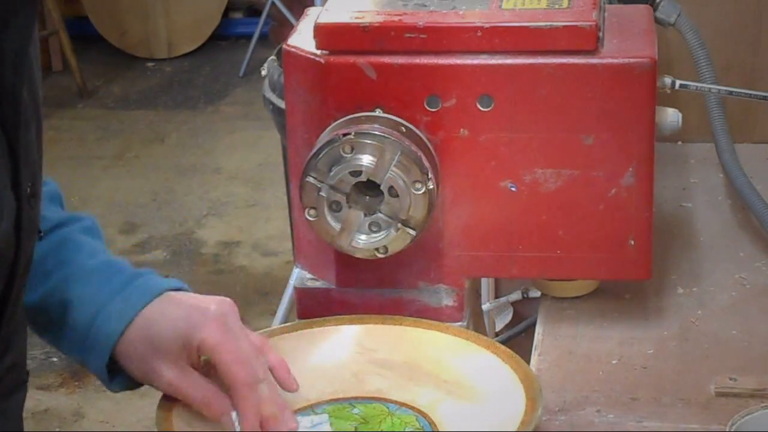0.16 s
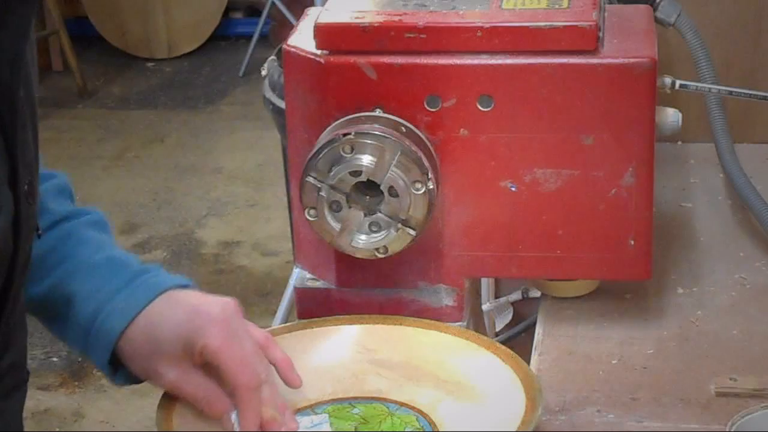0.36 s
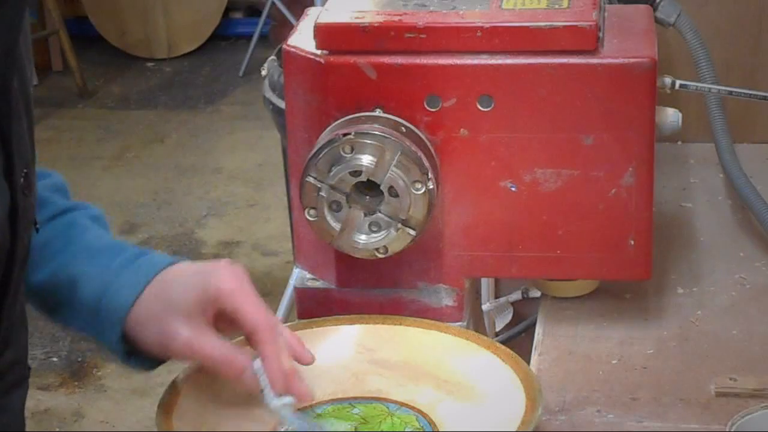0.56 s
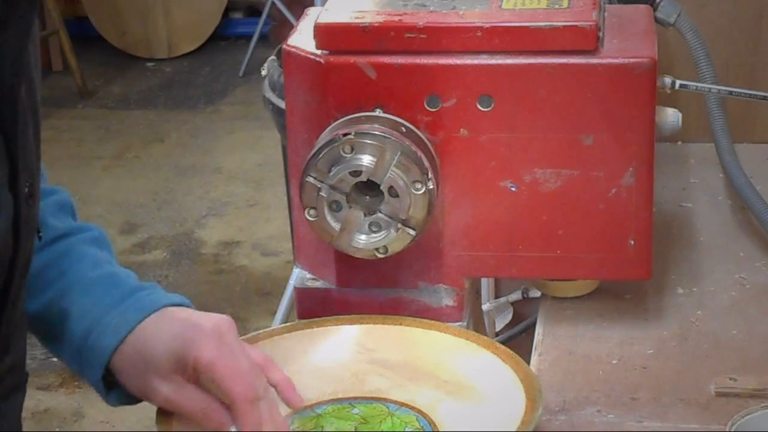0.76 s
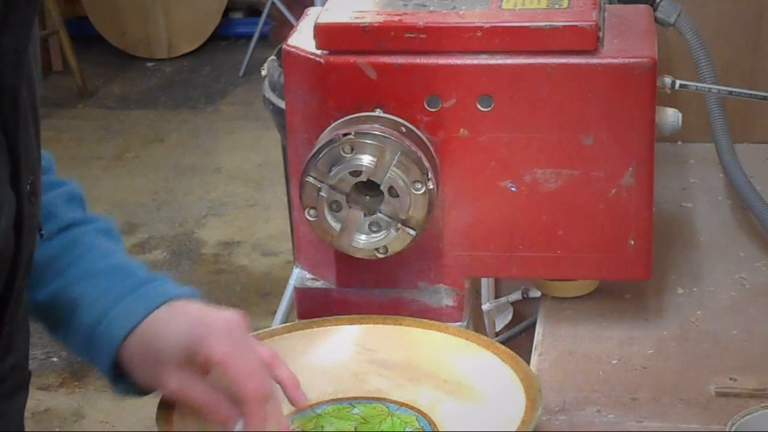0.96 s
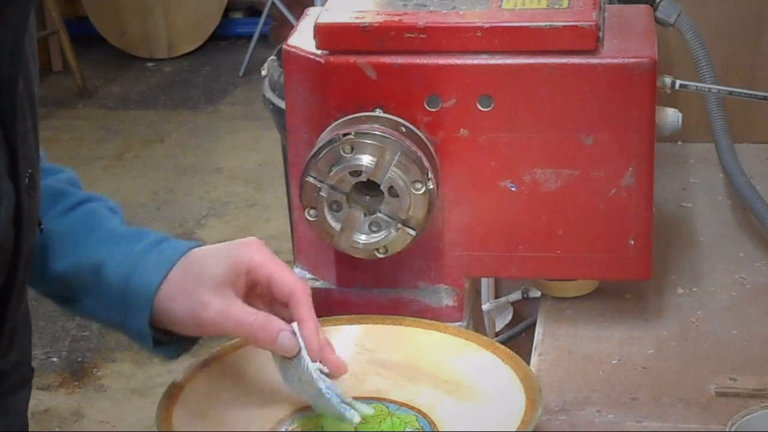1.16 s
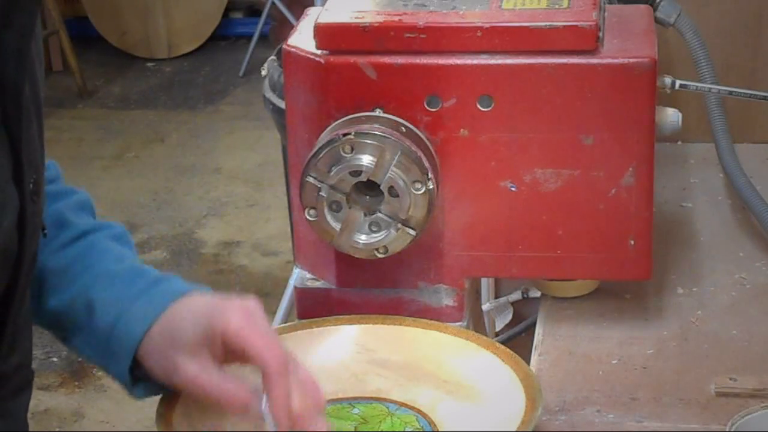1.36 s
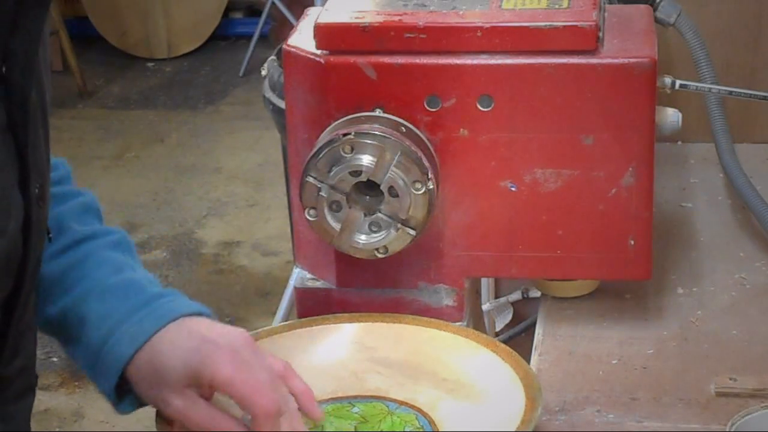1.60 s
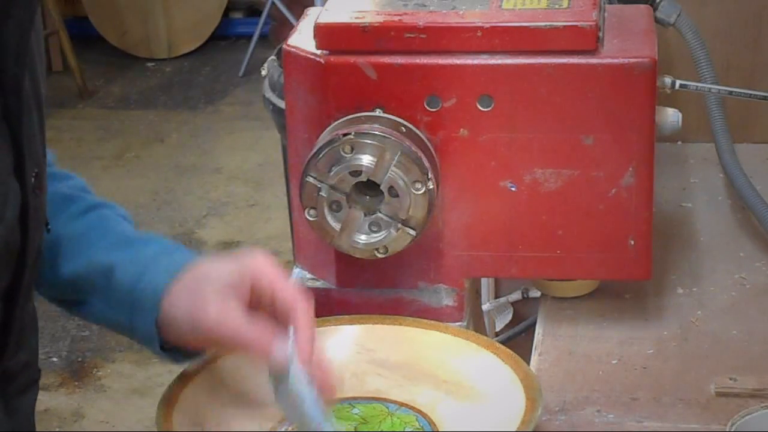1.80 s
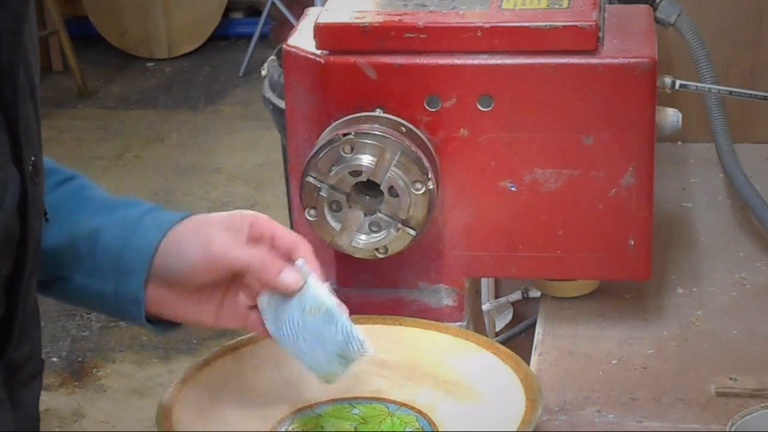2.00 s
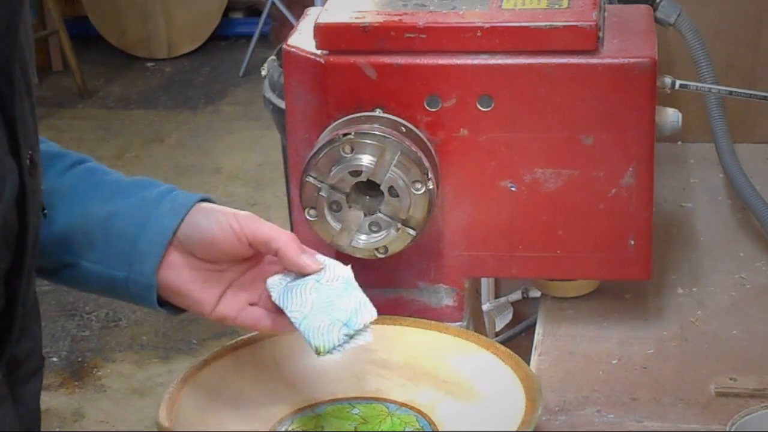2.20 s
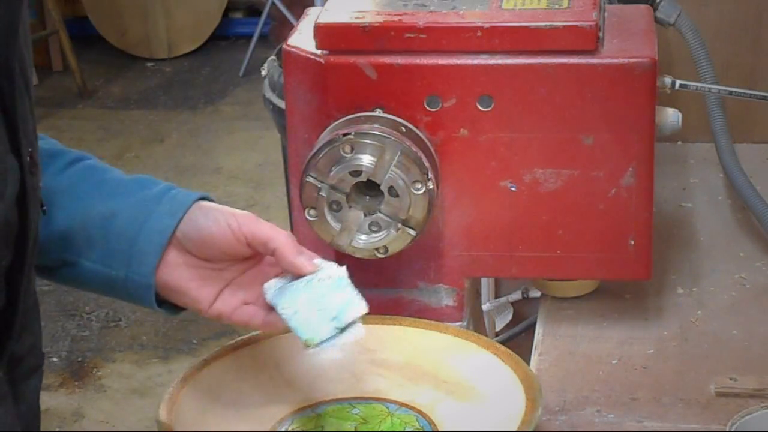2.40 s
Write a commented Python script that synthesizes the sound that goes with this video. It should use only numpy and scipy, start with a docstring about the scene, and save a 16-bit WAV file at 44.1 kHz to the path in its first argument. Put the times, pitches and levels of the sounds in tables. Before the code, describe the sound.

Close dabs of a folded paper towel knock lightly on a wooden bowl, the paper rustling as it presses and peels away, twice squeaking faintly. A quiet, steady electrical hum and hiss fill the small workshop behind.

```python
"""A folded paper towel is dabbed into a wooden bowl, close in front of the microphone in a small workshop.
Each dab knocks the wood, which thuds, cracks and rings briefly. The paper crackles as it is pressed
and peeled off: fibres catch and slip, creases snap, and twice it squeaks faintly.
Farther back are a steady mains hum, a thin electrical whine and soft hiss."""
import sys
import numpy as np
from scipy import signal
from scipy.fft import rfft, irfft
from scipy.io import wavfile

SR = 44100
rng = np.random.default_rng(int(sys.argv[2]) if len(sys.argv) > 2 else 0)


def file_out(sig):
    """Save sig as 16-bit WAV at sys.argv[1]."""
    # one column per channel
    cols = np.atleast_2d(sig).T
    # limit, then scale
    lim = np.clip(cols, -1, 1)
    pcm = np.round(lim * 32767).astype(np.int16)
    wavfile.write(sys.argv[1], SR, pcm)


N = 108000
T = np.arange(N) / SR


def from_db(db):
    """Decibels to gain."""
    return 10 ** (np.asarray(db) / 20)


def rms_one(x):
    """Scale to rms 1."""
    return x / np.sqrt(np.mean(x ** 2) + 1e-20)


def cut(x, hz, kind, order=2):
    """Butterworth low- or high-pass."""
    return signal.sosfilt(signal.butter(order, hz, kind, fs=SR, output="sos"), x + 1e-18)


def coloured(x, spectrum):
    """Give a white signal a spectrum, keeping its power."""
    hz, db = np.transpose(spectrum)
    gain = from_db(np.interp(np.log(np.fft.rfftfreq(N, 1 / SR) + 1), np.log(hz), db))
    return irfft(rfft(x) * rms_one(gain), N)


def drift(rate_hz):
    """Random wandering of spread 1, mostly slower than rate_hz."""
    rolloff = 1 + (np.fft.rfftfreq(N, 1 / SR) / rate_hz) ** 2
    return rms_one(irfft(rfft(rng.standard_normal(N)) / rolloff, N))


def swell(s, rise, fall):
    """Exponential rise to 1 at time s, then exponential fall."""
    return np.exp(-np.maximum((s - T) / rise, (T - s) / fall))


# Mains hum in the background: f/Hz, rms level/dB
HUM_TONES = [(100, -76), (200, -78.5), (300, -71), (400, -65.5), (500, -79.5), (555, -70.5), (600, -83.5)]
# Thin electrical whine high above it: f/Hz, rms level/dB
WHINE_TONES = [(7838, -76), (7897, -75.5), (12000, -79)]
def hum_and_whine(waver_db=1.5, wander_rad=0.19):
    """Steady electrical tones, each wavering a little in level and phase."""
    out = 0
    for hz, db in HUM_TONES + WHINE_TONES:
        peak = np.sqrt(2) * from_db(db - waver_db * drift(9))
        phase = 2 * np.pi * hz * T + wander_rad * drift(2.5) + rng.uniform(0, 2 * np.pi)
        out = out + peak * np.sin(phase)
    return out


# Room tone of the workshop: f/Hz, relative level/dB
HISS_SPECTRUM = [(25, -12), (45, -7.5), (70, -2), (100, 5), (170, -3.5), (270, -6), (400, 5), (560, 0.5),
                 (800, 3.5), (1150, 4.5), (1500, 3.5), (3000, 4), (4700, 5.5), (5500, -0.5), (7500, -1),
                 (9500, -3.5), (14000, -4.5)]
def hiss(level_db=-54.5):
    """Soft, even noise behind everything."""
    return from_db(level_db) * coloured(rng.standard_normal(N), HISS_SPECTRUM)


# The towel pressed or peeled, close up: loudest t/s, level/dB, rise/s, fall/s
TOWEL_MOVES = [(.03, -55.5, 0.085, 0.056), (.125, -54, 0.033, .03), (.18, -45.5, 0.022, 0.023),
               (0.474, -45.5, 0.031, .014), (0.495, -43, 0.0073, 0.017), (.635, -52, 0.047, .02),
               (.702, -49.5, 0.017, 0.022), (0.76, -42, 0.0073, .016), (.82, -52, 0.009, 0.009),
               (.906, -55, 0.0045, 0.01), (1.075, -38.5, 0.013, 0.022), (1.139, -47, 0.013, 0.022),
               (1.343, -47.5, 0.0034, 0.013), (1.425, -51, 0.043, 0.077), (1.55, -52.5, 0.014, 0.07),
               (1.65, -57, 0.024, 0.11), (1.782, -44.5, 0.026, 0.021), (1.828, -46, 0.0092, 0.0094),
               (2.03, -60.5, 0.057, 0.17)]
# Colour of its rustle: f/Hz, relative level/dB
RUSTLE_SPECTRUM = [(150, -30), (800, -22.5), (1200, -2.5), (1550, -8.5), (2050, -1.5), (3100, -5.5),
                   (3800, 2), (4300, -1), (4950, 2), (5400, -7), (7000, -7.5), (9000, -16), (14000, -25.5)]
def paper_rustle(fibres_per_s=5000, spread_db=4, friction_gain=0.75):
    """Fibres catch and slip in dense tiny clicks, over friction noise, under each movement."""
    sizes = from_db(spread_db * np.minimum(rng.exponential(1, N), 4))
    signs = rng.choice([-1, 1], N)
    slips = rng.random(N) < fibres_per_s / SR
    grain = rms_one(rms_one(sizes * signs * slips) + friction_gain * rng.standard_normal(N))
    power = sum((from_db(db) * swell(s, rise, fall)) ** 2 for s, db, rise, fall in TOWEL_MOVES)
    return coloured(grain * np.sqrt(power), RUSTLE_SPECTRUM)


# Single creases giving way: t/s, level/dB
CREASES = [(0.486, -36.5), (0.491, -42.5), (0.5473, -42), (0.761, -47), (1.032, -50), (1.078, -37.5),
           (1.139, -44.5), (1.341, -58), (1.812, -39), (1.826, -48)]
# Colour of a snap: f/Hz, relative level/dB
CREASE_SPECTRUM = [(200, -37), (600, -5), (1200, -8), (2100, -0.5), (4800, -1.5), (6000, -6), (14000, -19)]
def crease_snaps(rise_s=0.00036, fall_s=0.0044):
    """A crease snaps in a sharp, short burst of noise."""
    bursts = sum(from_db(db) * swell(s, rise_s, fall_s) for s, db in CREASES)
    return coloured(bursts * rng.standard_normal(N), CREASE_SPECTRUM)


def ring(x, hz, t60):
    """A unit click sets a sine of height 1 ringing."""
    decay, step = from_db(-60 / (t60 * SR)), 2 * np.pi * hz / SR
    return signal.lfilter([0, np.sin(step)], [1, -2 * decay * np.cos(step), decay ** 2], x + 1e-18)


def wood_mode(push, hz, t60, build_cycles=7.2):
    """A resonance of the bowl: it swells over a few cycles, then dies away."""
    # Neighbouring thud modes swing in opposite directions; each mode moves with the nearest one.
    nearest = np.argmin(np.abs(np.array(THUD_MODES)[:, 0] - hz))
    return (-1) ** nearest * (ring(push, hz, t60) - ring(push, hz, build_cycles / hz))


# Dabs knocking the bowl, close up: t/s, push level/dB, brightness f/Hz, low cut f/Hz,
# crack level/dB, ring gain/dB, place along the wall/0-1
DABS = [(.1756, -7.5, 1500, 204, -47, 0, 0.48), (.1872, -1, 2660, 224, -36, -2.5, 0.56),
        (0.3788, -8.5, 3430, 365, -35.5, 0.5, 0.57), (0.7676, -7, 510, 238, -59, -4, 0.28),
        (1.7210, -3.5, 3920, 148, -30.5, -1, 0), (1.7492, -8, 1680, 360, -43, -16, 0.53)]
# Dry crack of the wood's many close modes: f/Hz, relative level/dB
CRACK_SPECTRUM = [(80, -21), (170, -1), (260, -9.5), (380, -0.5), (580, -3), (780, 3), (1200, -1.5),
                  (2200, 5), (2900, -3.5), (4700, -9), (5600, -18), (12000, -39)]
# Broad, heavily damped modes of the bowl: f/Hz, gain/dB, t60/s
THUD_MODES = [(434.5, -19.5, 0.039), (561, -17.5, 0.036), (1147, -24, 0.032), (1475, -24.5, 0.011),
              (2107, -16.5, 0.011), (3620, -31, .02), (4650, -40, .03)]
# Its longer-ringing modes: f/Hz, gain/dB, t60/s
RING_MODES = [(240, -49, .35), (316, -44, .28), (386, -34, .22), (484, -35, .16), (515, -39, .15),
              (566, -27, .14), (596, -34, .13), (965, -44, .15), (1105, -30, .09), (1180, -31, .1),
              (1291, -39, .19), (1525, -41, .07), (1789, -35, .1), (1903, -43, .11), (2081, -34, .09),
              (2283, -43, .12), (2587, -40, .08)]
def bowl_knocks(crack_rise_s=0.00097, crack_fall_s=0.012, place_swing_db=6.5):
    """Each cushioned push gives a dry crack, a thud and a ring whose modes depend on where it lands."""
    pushes, crack_envelope = [], 0
    for s, db, bright_hz, low_cut_hz, crack_db, _, _ in DABS:
        click = from_db(db) * (np.arange(N) == int(s * SR))
        cushioned = cut(click, bright_hz, "low", order=1)
        pushes.append(cut(cushioned, low_cut_hz, "high", order=3))
        crack_envelope += from_db(crack_db) * swell(s + crack_rise_s, crack_rise_s, crack_fall_s)
    crack = coloured(crack_envelope * rng.standard_normal(N), CRACK_SPECTRUM)
    thud = sum(from_db(db) * wood_mode(sum(pushes), hz, t60) for hz, db, t60 in THUD_MODES)
    *_, ring_db, place = np.transpose(DABS)
    ringing = 0
    for k, (hz, db, t60) in enumerate(RING_MODES):
        strengths = from_db(db + ring_db + place_swing_db * np.cos(np.pi * k * place))
        ringing += wood_mode(strengths @ np.array(pushes), hz, t60)
    return crack + thud + ringing


# Faint squeaks at the bowl, the second in two parts: t/s, length/s, start f/Hz, end f/Hz, level/dB
SQUEAK_GLIDES = [(0.214, 0.12, 4110, 4350, -57.5), (1.868, 0.078, 3710, 3670, -58.5),
                 (1.96, .08, 3640, 3540, -62)]
def paper_squeaks(waver_hz=32.4, flutter_db=3.5):
    """The paper squeaks in thin, slightly unsteady gliding tones."""
    out = 0
    for s, length, start_hz, end_hz, db in SQUEAK_GLIDES:
        progress = np.clip((T - s) / length, 0, 1)
        hz = start_hz + (end_hz - start_hz) * progress + waver_hz * drift(103)
        level = from_db(db + flutter_db * drift(60))
        arch = np.sqrt(2 * np.abs(np.sin(np.pi * progress)))
        out = out + level * arch * np.sin(2 * np.pi * np.cumsum(hz) / SR)
    return out


# Reflections off surfaces near the bowl: delay t/s, level/dB
REFLECTIONS = [(.0095, -26), (0.0152, -6.5)]
def near_echoes(x):
    """Nearby surfaces send late, weaker copies to the microphone."""
    return sum(from_db(db) * np.interp(T - delay, T, x, left=0) for delay, db in REFLECTIONS)


def workshop_reverb(x, bass_t60=0.34, treble_t60=0.32, split_hz=220, build_s=0.0095):
    """Diffuse reverberation that builds up quickly and dies slightly sooner in the treble."""
    t, noise = T[:SR], rng.standard_normal(SR)
    bass = cut(noise, split_hz, "low", order=1)
    tail = bass * from_db(-60 * t / bass_t60) + (noise - bass) * from_db(-60 * t / treble_t60)
    tail *= 1 - np.exp(-(t / build_s) ** 2)
    return signal.fftconvolve(x, tail / np.sqrt(np.sum(tail ** 2)))[:N]


def scene(room_db=-10.5):
    """Bowl and towel close and straight ahead, the workshop behind; the same in both channels."""
    wood = bowl_knocks()
    towel = paper_rustle() + crease_snaps()
    room = near_echoes(wood) + workshop_reverb(from_db(room_db) * (wood + towel))
    at_microphone = wood + towel + paper_squeaks() + room + hum_and_whine() + hiss()
    return np.tile(at_microphone, (2, 1))


def record(dry, cutoff_hz=14350):
    """The top of the microphone signal is cut steeply."""
    return signal.sosfilt(signal.ellip(14, .1, 80, cutoff_hz, fs=SR, output="sos"), dry)


dry = scene()
out = record(dry)
file_out(out)
```